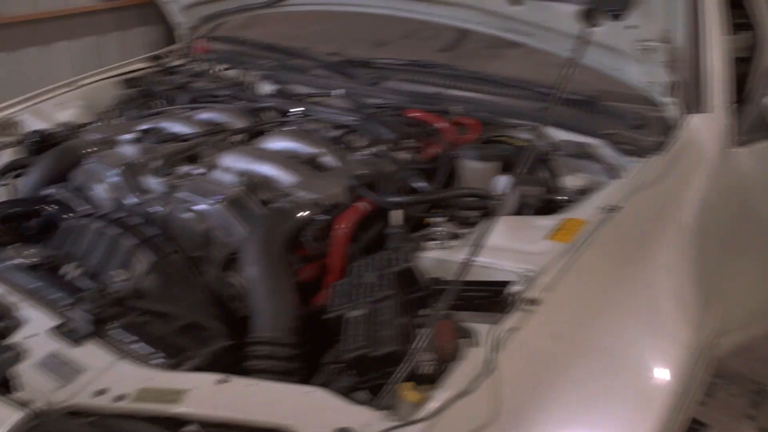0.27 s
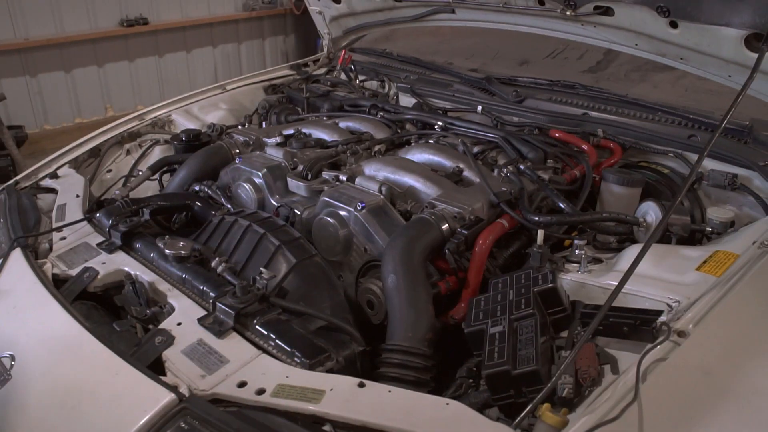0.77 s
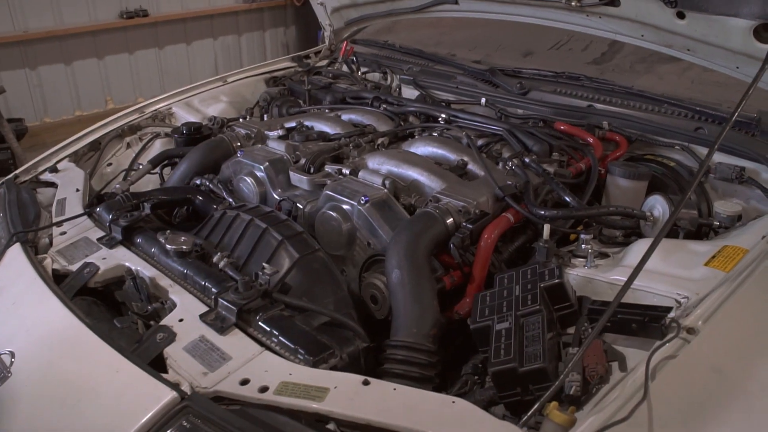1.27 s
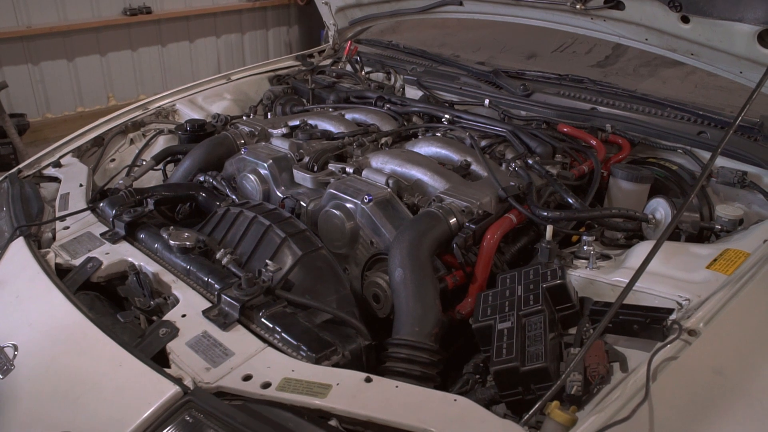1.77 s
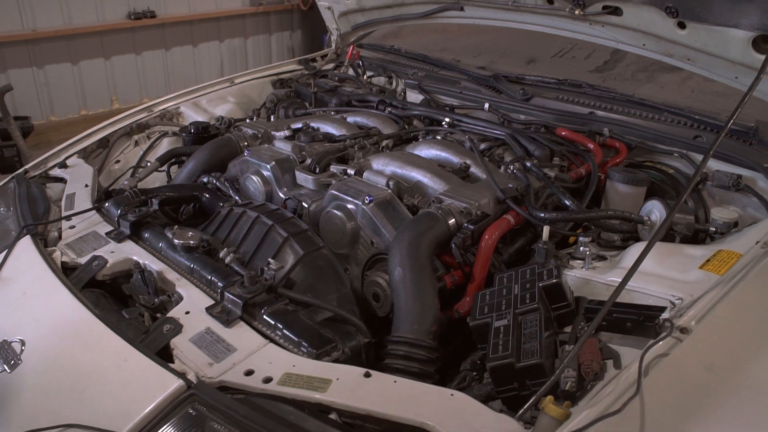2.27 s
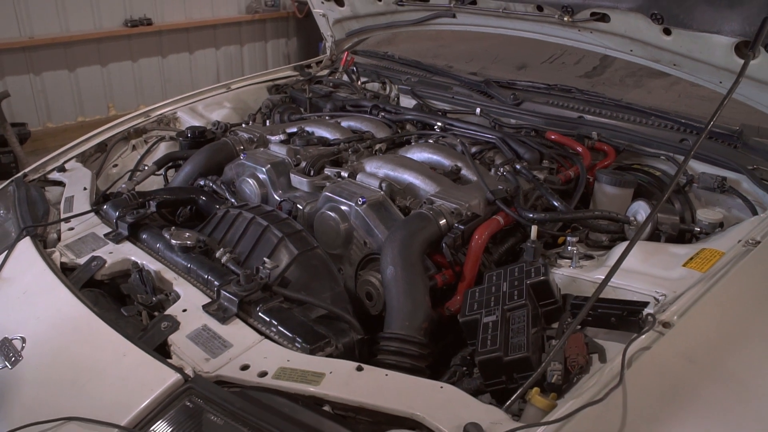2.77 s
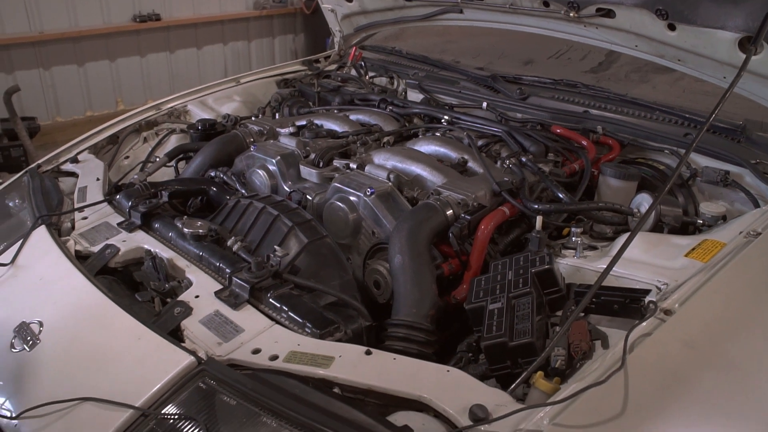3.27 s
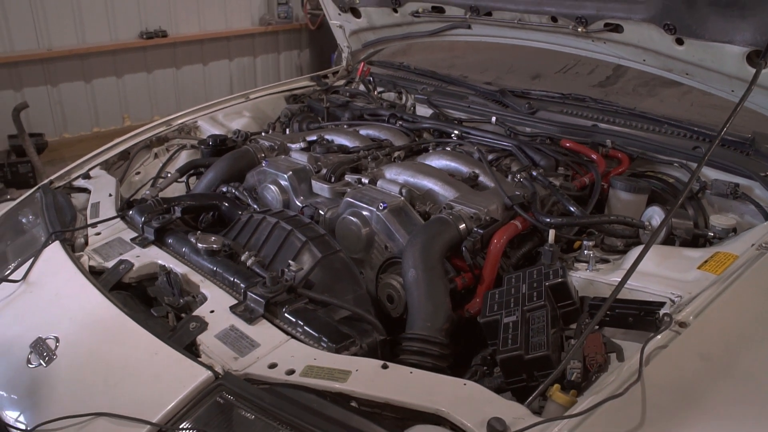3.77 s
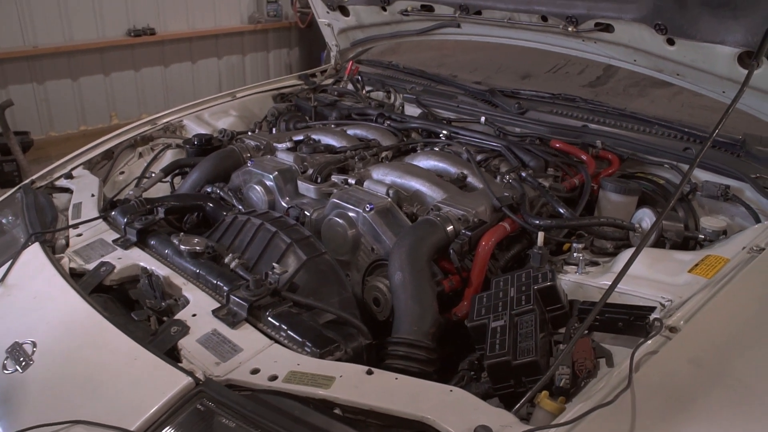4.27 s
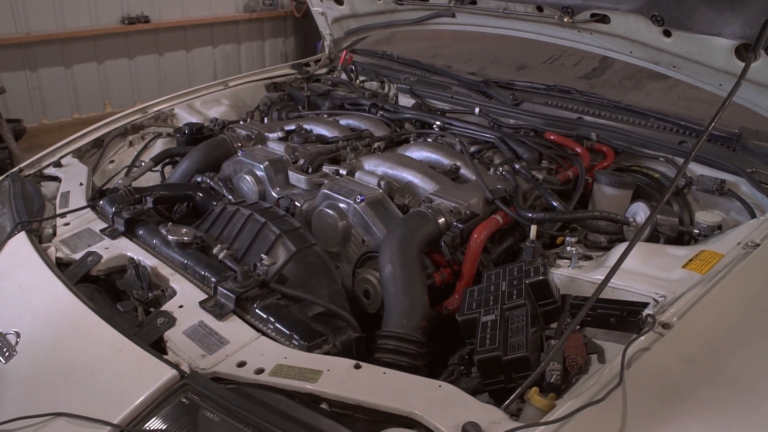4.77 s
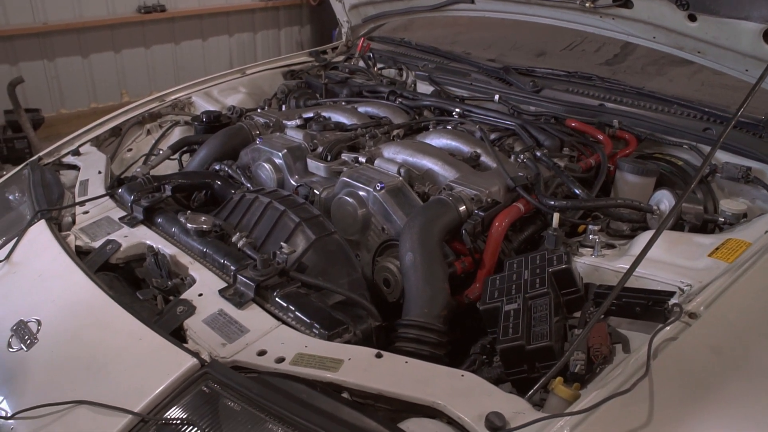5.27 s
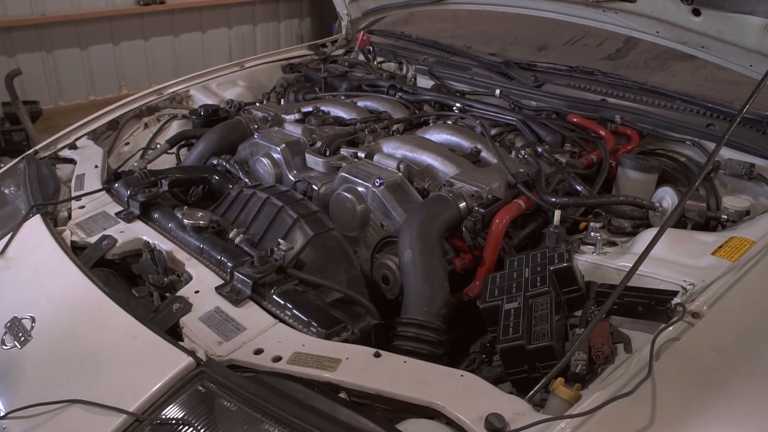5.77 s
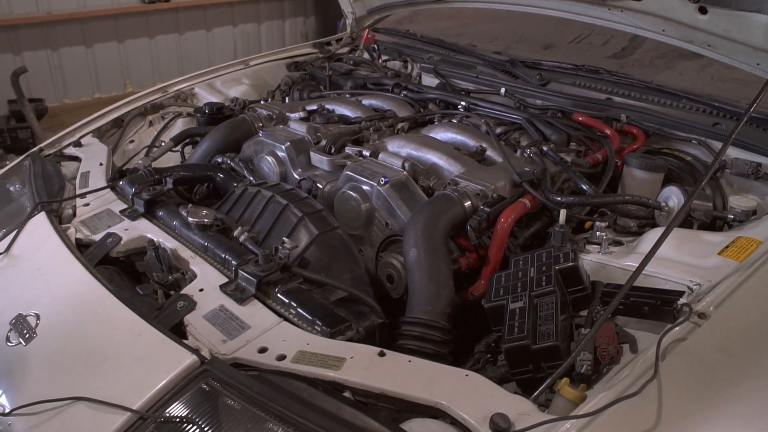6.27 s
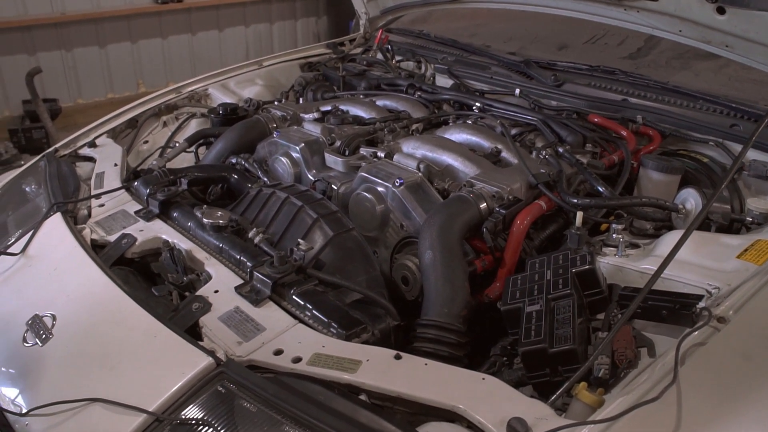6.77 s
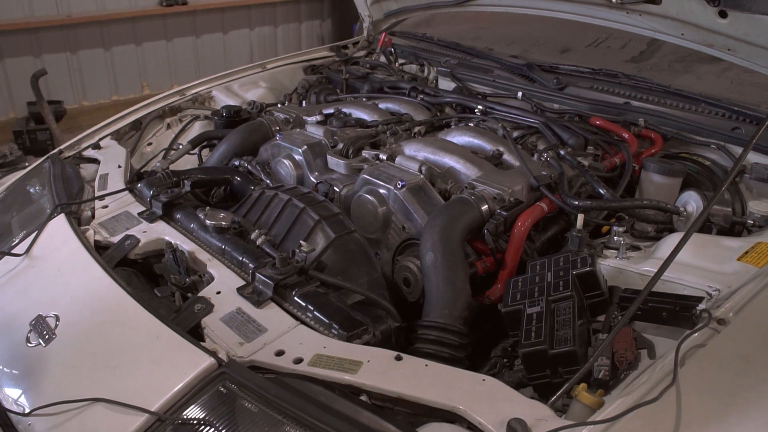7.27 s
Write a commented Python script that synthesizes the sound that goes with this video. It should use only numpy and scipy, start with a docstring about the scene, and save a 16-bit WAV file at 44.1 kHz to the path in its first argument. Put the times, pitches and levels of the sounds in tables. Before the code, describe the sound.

Close under an open bonnet in a workshop, a starter clashes in and grinds with whining gears and thumping compressions for under a second. The engine catches with uneven booms while slipping belts screech. It settles into a fast idle, mostly buried under two wavering high squeals, bright rubber hiss and small chirps. At the very end the throttle opens and the belts scream.

```python
"""Slipping drive belts on a V6 car engine, close under its open bonnet in a workshop, on one microphone.
Two wavering squeal modes, made of tones and narrow noise, ride over a bright hiss and rasp of shaped noise.
Slack stretches sag the pitch as the belts go round; skips chirp, and at the end the throttle opens and they scream.
The starter grinds first, with whining gear teeth and thumps; the engine catches, stumbles and idles fast,
built from crank harmonics and rumble. Behind the belts and starter the workshop answers with short echoes."""
import sys
import numpy as np
from scipy import signal
from scipy.fft import rfft, irfft, next_fast_len
from scipy.io import wavfile
from scipy.ndimage import uniform_filter1d, map_coordinates

SR = 44100
rng = np.random.default_rng(int(sys.argv[2]) if len(sys.argv) > 2 else 0)


def digitize_waveform(pressure):
    """Quantize a signal to 16-bit integers and store it at the path in sys.argv[1].

    Rows of a 2-D input are taken as channels; values are limited to [-1, 1].
    """
    field = np.atleast_2d(pressure).T
    bounded = np.clip(field, -1, 1)
    quanta = np.round(bounded * 32767).astype(np.int16)
    wavfile.write(sys.argv[1], SR, quanta)


N = 331632

# Levels are set before each layer's trim; spectra are relative, since each layer is brought to rms 1.
# the slipping belt goes round at a nearly even pace: (time [s], distance run [laps])
BELT_TRAVEL = [(.73, 0), (2.03, 5), (2.32, 6), (7.52, 26.25)]
# slack stretches reaching the pulley once a lap, sags before looseness and scatter:
# (place [laps], fall [laps], recovery [laps], pitch sag [octaves])
SLACK_STRETCHES = [(-.01, .11, .21, .36), (.52, .1, .1, .21)]
# how loose the belt runs: (time [s], factor on the sags [ratio])
LOOSENESS = [(.85, .2), (1, 1), (1.15, .1), (1.55, .1), (1.65, 1.1), (1.8, .8), (2.1, .6), (2.4, .8),
             (2.85, 1.4), (3.4, 1.4), (3.7, 1.05), (5, .8), (6.2, .8), (7.2, 1.2), (7.4, .1)]
# lower belt mode while the belt is taut: (time [s], pitch [Hz])
TAUT_PITCH = [(.8, 3500), (.87, 3100), (1.1, 3020), (1.24, 3260), (1.45, 2950), (1.5, 3300), (1.55, 2980),
              (1.6, 3220), (1.72, 3000), (1.97, 3200), (2.07, 2780), (2.5, 2580), (6.3, 2600), (6.55, 2400),
              (7.26, 2400), (7.43, 1240)]
# the upper mode clings to a pulley resonance: (lower mode [Hz], upper mode [Hz])
UPPER_MODE = [(1350, 3000), (1900, 3200), (2150, 3300), (2330, 3790), (2620, 3870), (2850, 4250),
              (3100, 4500), (3250, 4750)]
# lower belt mode: (time [s], level [dB])
LOWER_LEVEL = [(.8, -40), (.88, -22.5), (1.1, -20), (1.2, -31), (1.57, -46), (1.61, -18), (2.15, -19.5),
               (2.4, -25), (3.8, -25.5), (4.3, -23), (6.2, -25), (6.5, -30), (7.52, -31)]
# upper belt mode: (time [s], level [dB])
UPPER_LEVEL = [(.8, -45), (.83, -19.5), (.95, -35), (1.18, -20), (1.46, -36), (1.51, -22), (1.65, -27.5),
               (2.1, -30.5), (2.7, -27.5), (5, -27.5), (6.3, -28.5), (7.52, -32)]
# the upper mode tears into a screech while the engine catches: (time [s], noisy skirt against core [ratio])
SCREECH = [(.8, 2), (.9, 1.1), (1.1, 1), (1.18, 2.6), (1.46, 2.6), (1.5, .8), (1.58, 1.8), (1.7, .9),
           (2.2, .55), (6.3, .55), (7.3, 1.1)]
# belt rubbing on the pulleys: (time [s], level [dB])
SLIP_LEVEL = [(.72, -72), (.745, -21.5), (.8, -49), (.83, -26), (.95, -23), (1.21, -22), (1.27, -33.5),
              (1.48, -39), (1.53, -23), (1.57, -23.5), (4.2, -22.5), (7.52, -22.5)]
# bright hiss of the rubbing: (frequency [Hz], density [dB per Hz])
HISS_SPECTRUM = [(800, -35.5), (2000, -19.5), (3000, -2), (4400, -8), (5500, -9.5), (6700, 1), (8400, -2),
                 (9400, 0), (10600, -13), (12300, -11), (13800, -8), (15800, -16.5)]
# rasp of the rubbing: (frequency [Hz], density [dB per Hz])
RASP_SPECTRUM = [(300, -10), (700, -16.5), (1020, -8), (1800, 2.5), (3000, 5), (4200, -11.5), (5400, 5),
                 (7000, 0.5), (10000, -21), (15000, -28)]
# pulleys and brackets rung by a slack belt: (frequency [Hz], width [Hz], level against the hiss [dB])
PULLEYS = [(1290, 400, -14), (1830, 300, -13), (4760, 240, -15), (5380, 340, -10)]
# short falling chirps of a skipping belt: (time [s], level [dB])
CHIRPS = [(2.235, -33), (2.31, -42), (2.44, -32), (2.77, -32), (3.051, -26.5), (3.329, -36), (3.49, -26),
          (3.57, -34), (4.51, -31), (5.02, -36), (6.71, -25.5), (6.809, -27), (6.92, -27), (6.97, -38),
          (7.07, -36), (7.19, -25.5)]
# the throttle opens: (time [s], groan level [dB], scream level [dB])
REV_LEVEL = [(7.26, -55, -48), (7.35, -43, -32), (7.38, -27, -18), (7.45, -38, -18), (7.52, -24, -15.5)]
# broad scream of the belts: (frequency [Hz], density [dB per Hz])
SCREAM_SPECTRUM = [(700, -18), (1200, -5.5), (2200, -7), (3600, -7), (4700, -7), (6700, 2), (8500, -4),
                   (10500, -9), (15000, -15)]
# the starter engages with a clash, turns and drops out: (time [s], grinding level [dB])
STARTER_LEVEL = [(0.0, -27), (0.012, -11.5), (0.054, -19.5), (0.11, -16), (0.79, -19.5), (0.884, -32),
                 (0.9, -38)]
# starter housing coloring the grind: (frequency [Hz], density [dB per Hz])
HOUSING = [(88, -67.5), (150, -37), (343, -29), (378, -13), (486, -8.5), (545, -22.5), (624, -12.5),
           (1030, -5.5), (1490, -12.5), (1700, -12), (2500, -15), (3540, -18), (3820, -21.5), (4290, -19),
           (15000, -40.5)]
# ring gear and bell housing resonances: (frequency [Hz], width [Hz], gain [dB])
GEAR = [(495, 50, 6), (850, 70, 11), (1030, 80, 12), (1250, 80, 13), (1730, 110, 13), (2510, 130, 10)]
# solenoid kick, then compression strokes: (time [s], thump level [dB])
STROKES = [(0.012, -26), (0.201, -23), (0.317, -19), (0.422, -23), (0.506, -24), (0.593, -19), (0.678, -19),
           (0.76, -75), (0.804, -20)]
# low rumble of the engine being turned over: (frequency [Hz], density [dB per Hz])
TURNING_SPECTRUM = [(30, -10), (70, -3), (200, -2), (400, -10), (900, -40)]
# crankshaft: (time [s], speed [turns per second])
CRANK_SPEED = [(0, 3), (.7, 4.5), (.8, 18), (1, 22), (1.15, 19), (1.55, 21), (1.8, 17.5), (2.25, 23.9),
               (2.63, 25.1), (2.95, 27.1), (3.78, 26.6), (4.65, 23.8), (5.4, 24.5), (6.2, 24.1),
               (6.75, 31.3), (7.2, 29.6), (7.35, 38), (7.52, 43)]
# engine layers: (time [s], exhaust boom [dB], exhaust drone [dB], intake and block [dB])
ENGINE_LEVEL = [(0.76, -22, -43, -37), (0.81, -28, -24.5, -31), (0.89, -30, -30.5, -42),
                (1.14, -36, -37, -40), (1.27, -21.5, -28, -29), (1.4, -24.5, -25, -28),
                (1.44, -12.5, -29, -31), (1.47, -33, -28, -26.5), (1.51, -19, -24, -31),
                (1.55, -27, -29.5, -41), (1.87, -41, -41, -46.5), (2.0, -27, -32.5, -44),
                (2.23, -43, -37, -49.5), (2.4, -36, -36, -45.5), (3.32, -45.5, -39, -46.5),
                (5.77, -46, -42.5, -43.5), (6.16, -47, -37, -43), (6.41, -52, -43, -45.5),
                (7.16, -57, -48, -47), (7.35, -20.5, -24.5, -33.5), (7.44, -42, -19, -32),
                (7.52, -39, -26, -33)]
# uneven firing: (time [s], roughness [0-1])
STUMBLE = [(.8, .55), (1.5, .6), (1.8, .4), (2.3, .1), (6.2, .1), (6.5, .25), (7.5, .25)]
# harmonics of the exhaust boom: (multiple of crank speed [ratio], level [dB])
BOOM_ORDERS = [(1, -9), (2, 0), (3, -8)]
# harmonics of the exhaust drone: (multiple of crank speed [ratio], level [dB])
DRONE_ORDERS = [(3, -4), (4, 3.5), (5, -1), (6, 1), (7, 3), (8, -3), (9, -11), (10, 0.5), (11, -5),
                (12, -5)]
# exhaust pipe response: (frequency [Hz], gain [dB])
PIPE = [(20, -22), (38, -21), (47, 0), (58, 2.5), (72, -5), (84, -1.5), (108, -8.5), (121, 0.5), (134, 5.5),
        (146, 6.5), (162, -3), (192, -5), (216, 1), (245, -3), (290, -35), (324, 0.5), (380, -33),
        (600, -35)]
# intake and block noise: (frequency [Hz], density [dB per Hz])
BLOCK_SPECTRUM = [(120, -25), (200, 5), (282, -7), (467, 1), (570, -5.5), (912, -6.5), (2650, -3),
                  (4550, -9), (5550, -11), (5970, -3.5), (6650, -12), (13000, -34), (15000, -41)]
# resonances of the engine bay: (frequency [Hz], width [Hz], gain [dB])
BAY = [(522, 40, 5.5), (567, 55, -3.5), (789, 38, 8), (1011.4, 66, 12), (1274, 50, 3), (1800, 76, 0.5),
       (2030, 87, -5), (3665, 240, 4.5), (4480, 1380, 5.5), (5560, 136, 3), (6540, 280, 2.5),
       (7996, 320, 7), (8514, 260, 8.5)]
# echo of the workshop: (frequency [Hz], time to die by 60 dB [s])
WORKSHOP_DECAY = [(200, 0.21), (2000, 0.08), (12000, 0.019)]

SAG_SCATTER = .12  # random share by which the sags vary
STEADY_SHARE = .5  # power share of a squeal's core that is an unbroken tone
UPPER_SLACK_DB_PER_OCTAVE = 2.5  # the upper mode's level rises with the sag
SHRIEK_DB, OVERTONE_DB = -8, -12  # second and third harmonic of the upper mode, before tautness and trim
CHATTER_DB = 0.76  # quick flutter of all the rubbing
SURGE_DB = .9  # irregular surging of the hiss
SIZZLE_SLACK_DB_PER_OCTAVE = -17  # the finest sizzle fades as the pitch falls
RASP_BELOW_HZ = 2460  # under this pitch the belt rasps more than it sings
TOOTH_START_HZ, TOOTH_FULL_HZ, SPIN_UP_S = 130, 561.6, .24  # unloaded tooth rate climbs and levels off
TOOTH_JITTER = .009  # unsteadiness as a share of the tooth rate
REBOUND = .09  # share by which the pinion speeds up as a compression lets go
LOAD_LAG_S, LOAD_WIDTH_S, LOAD_DB = 0.0162, .02, 5  # each compression makes the gears grind harder
# whine against the grinding: clear at first, it drowns with time
WHINE_DB, WHINE_FADE_DB_PER_S, WHINE_LOAD_DB = -1, 7, 1.5
WHINE_FLICKER_DB = 5  # each harmonic of the whine comes and goes on its own
TURNING_DB = -47
BOOM_DB, DRONE_DB, BLOCK_DB = 0.5, 1.5, 7.5  # trim of each engine layer
SWELL_S, SWELL_WIDTH_S, SWELL_DB = 4.9, 0.26, 4.5  # the drone swells once at idle
TOP_HZ = 15800  # upper limit of the microphone's band


def amp(db):
    """Decibels to gain."""
    return 10 ** (np.asarray(db) / 20)


def unit(x):
    """Scaled to rms 1."""
    return x / np.sqrt(np.mean(x ** 2) + 1e-20)


def along(points, hz):
    """(Hz, value) points read on a log frequency axis."""
    f, v = np.transpose(points)
    return np.interp(np.log(hz + 1), np.log(f + 1), v)


def curves(rows):
    """One value per sample for each column after the time."""
    s, *cols = np.transpose(rows)
    return [np.interp(np.arange(N) / SR, s, c) for c in cols]


def during(rows):
    """1 while a table lasts, fading over 30 ms outside it."""
    t = np.arange(N) / SR
    inside_s = np.minimum(t - rows[0][0], rows[-1][0] - t)
    return np.clip(1 + inside_s / .03, 0, 1)


def bump(x, width):
    """A bell of height 1 around x = 0."""
    return np.exp(-(x / width) ** 2)


def wobble(rate):
    """A smooth random curve, rate knots a second."""
    knots = rng.standard_normal(N // 8 + 2)
    places = np.arange(N) / 8
    smooth = map_coordinates(knots, [places])
    return np.interp(np.arange(N) * rate / SR, places, smooth)


def filtered(x, response):
    """x times a response of frequency."""
    m = next_fast_len(N + SR // 2)
    return irfft(rfft(x, m) * response(np.fft.rfftfreq(m, 1 / SR)), m)[:N]


def peaks(table, hz):
    """Gain of (Hz, width, dB) resonances."""
    return amp(sum(db / (1 + (2 * (hz - centre) / width) ** 2) for centre, width, db in table))


def coloured(x, spectrum):
    """x through a (Hz, dB) spectrum, at rms 1."""
    return unit(filtered(x, lambda hz: amp(along(spectrum, hz))))


def grit(spectrum, spread_db):
    """Dense tiny contacts of scattered sizes, through a spectrum."""
    contacts = rng.standard_normal(N) * amp(spread_db * wobble(2500))
    return coloured(contacts, spectrum)


def angle(hz):
    """Running phase of a changing frequency."""
    return 2 * np.pi * np.cumsum(hz) / SR


def ringing(hz, width_hz):
    """A moving resonance kept ringing by friction, rms 1."""
    phase = angle(hz)
    return unit(wobble(width_hz) * np.cos(phase) + wobble(width_hz) * np.sin(phase))


def belt_pitch():
    """Lower mode's pitch [Hz] and sag [octaves]: each slack stretch drops it, then tension returns."""
    laps, = curves(BELT_TRAVEL)
    slack = 0
    for place, fall, recovery, octaves in SLACK_STRETCHES:
        past = (laps - place + .5) % 1 - .5
        slack = slack + octaves * bump(past, np.where(past < 0, fall, recovery))
    sag = curves(LOOSENESS)[0] * slack * (1 + SAG_SCATTER * wobble(8))
    return curves(TAUT_PITCH)[0] * 2 ** -sag, sag


def squeal_mode(hz, skirt):
    """Friction feeds a mode in fits and starts: a sharp core in a fuzzy skirt."""
    tone = np.sqrt(2 * STEADY_SHARE) * np.sin(angle(hz))
    core = tone + np.sqrt(1 - STEADY_SHARE) * ringing(hz, width_hz=120)
    voice = (core + skirt * ringing(hz, width_hz=650)) / np.sqrt(1 + skirt ** 2)
    return unit(voice * amp(1.7 * wobble(45)))


def squeal(crank, pitch, sag):
    """Stick-slip friction drives two competing belt modes, with overtones that grow on a taut belt."""
    lower_db, = curves(LOWER_LEVEL)
    upper_db = curves(UPPER_LEVEL)[0] + UPPER_SLACK_DB_PER_OCTAVE * sag
    slip_db, = curves(SLIP_LEVEL)
    screech, = curves(SCREECH)
    taut = np.clip((pitch - 2300) / 800, 0, 1)
    flutter = 1 + .012 * wobble(35) + 0.0047 * np.sin(3 * crank)
    upper_hz = np.interp(pitch, *np.transpose(UPPER_MODE)) * flutter
    # one mode swells as the other fades
    rivalry_db = 0.53 * wobble(16)
    lower_gain = amp(lower_db - 8.5 + 0.38 * taut + rivalry_db)
    lower = lower_gain * squeal_mode(pitch * flutter, screech / 2)
    upper = amp(upper_db - 6.0 - rivalry_db) * squeal_mode(upper_hz, screech)
    # broad shriek around twice the upper mode, stronger when taut
    shriek = amp(slip_db - 14.5 + 10 * taut) * ringing(2 * upper_hz, width_hz=1300)
    second = amp(SHRIEK_DB) * ringing(2 * upper_hz, width_hz=400)
    third = amp(OVERTONE_DB) * ringing(3 * upper_hz, width_hz=900)
    overtones = amp(upper_db - 7) * taut * (second + third)
    return during(LOWER_LEVEL) * (lower + upper + shriek + overtones)


def rubbing(crank, pitch):
    """Rubber skids on the pulleys: bright hiss, rasp and sizzle; slack stretches ring the pulleys harder."""
    slip_db, = curves(SLIP_LEVEL)
    # octaves under the pitch where rasping takes over
    slack = np.log2(RASP_BELOW_HZ / pitch)
    chatter = amp(CHATTER_DB * (wobble(45) + wobble(250) + np.sin(4 * crank)))
    hiss = grit(HISS_SPECTRUM, spread_db=1) * amp(SURGE_DB * wobble(22))
    # a taut belt hardly rasps
    bite_db = 18 * np.clip(slack, -.4, 0) + 4 * np.clip(slack, 0, .5) + 0.96 * wobble(30)
    rasp = grit(RASP_SPECTRUM, spread_db=5.0) * amp(bite_db - 3.5)
    rings = sum(amp(db) * ringing(np.full(N, hz), width) for hz, width, db in PULLEYS)
    pulleys = np.clip(3 * slack, .15, 1.2) * rings
    sizzle_db = -13.5 + SIZZLE_SLACK_DB_PER_OCTAVE * slack + 3.76 * wobble(25)
    sizzle = grit([(7000, -36), (10500, 2), (13800, 2), (15800, -11)], spread_db=5) * amp(sizzle_db)
    return during(SLIP_LEVEL) * amp(slip_db) * chatter * (hiss + rasp + pulleys + sizzle)


def chirps():
    """Each skip of the belt gives a brief squeak that falls in pitch."""
    t = np.arange(N) / SR
    nearest = np.abs(t[:, None] - np.transpose(CHIRPS)[0]).argmin(axis=1)
    s, db = np.array(CHIRPS)[nearest].T
    # falls at 4000 Hz per second through 1830 Hz
    hz = 1830 - 4000 * np.clip(t - s, -.05, .05)
    squeak = np.sin(angle(hz)) + 0.29 * ringing(hz, width_hz=660)
    return amp(db + 4.5) * bump(t - s, 0.016) * squeak


def rev(crank, pitch):
    """The crank pulley runs away from the belt: a low groan under a broad scream."""
    groan_db, scream_db = curves(REV_LEVEL)
    groan = amp(groan_db) * ringing(pitch, width_hz=200)
    scream = amp(scream_db + 1.1 * np.sin(3 * crank)) * grit(SCREAM_SPECTRUM, spread_db=0)
    onset = np.clip((np.arange(N) / SR - REV_LEVEL[0][0]) * 20, 0, 1)
    return onset * (groan + scream)


def gear_whine(tooth_hz):
    """Harmonics of the meshing teeth excite the gear resonances; rms 1 while the starter turns."""
    mesh = angle(tooth_hz * (1 + TOOTH_JITTER * wobble(120)))
    teeth = 0
    for k in range(2, 9):
        flicker = amp(WHINE_FLICKER_DB * wobble(25))
        teeth = teeth + flicker * np.sin(k * mesh + rng.uniform(0, 2 * np.pi)) / np.sqrt(k)
    active = during(STARTER_LEVEL)
    return unit(filtered(teeth * active, lambda hz: peaks(GEAR, hz))) * np.sqrt(np.mean(active))


def starter():
    """The pinion whines and grinds on the ring gear; each compression loads it and thumps the block."""
    t = np.arange(N) / SR
    grind_db, = curves(STARTER_LEVEL)
    load = sum(bump(t - s - LOAD_LAG_S, LOAD_WIDTH_S) for s, db in STROKES).clip(0, 1)
    spin_up = (TOOTH_START_HZ - TOOTH_FULL_HZ) * np.exp(-t / SPIN_UP_S)
    tooth_hz = (TOOTH_FULL_HZ + spin_up) * (1 + REBOUND * load)
    whine_db = WHINE_DB - WHINE_FADE_DB_PER_S * t + WHINE_LOAD_DB * load
    thumps = sum(amp(db) * bump(t - s - .003, 0.0065) * np.cos(2 * np.pi * 58 * (t - s))
                 for s, db in STROKES)
    whine = amp(whine_db) * gear_whine(tooth_hz)
    gear_ring = amp(-4.5) * bump(t - .16, 0.16) * ringing(np.full(N, 1725.), width_hz=36.0)
    # the grind gives way where the whine is strong
    grind = grit(HOUSING, spread_db=0.5) * amp(2.5 * wobble(109.3)) / np.sqrt(1 + 2 * amp(2 * whine_db))
    clash = grit([(1000, 1.5), (2500, -13), (8000, 1.0), (15000, -29)], spread_db=6) * load
    motor = amp(3.0 + LOAD_DB * load) * grind + whine + gear_ring + amp(-8.5) * clash
    turning = amp(TURNING_DB) * grit(TURNING_SPECTRUM, spread_db=-2)
    return during(STARTER_LEVEL) * (amp(grind_db - 4.0) * motor + turning) + thumps


def engine(crank):
    """Exhaust boom and drone, with intake and block noise pulsing once and three times a turn."""
    boom_db, drone_db, block_db = curves(ENGINE_LEVEL)
    drone_db = drone_db + SWELL_DB * bump(np.arange(N) / SR - SWELL_S, SWELL_WIDTH_S)
    rough = np.clip(curves(STUMBLE)[0], 0, 1)
    boom_rumble = [(15, -26), (35, -37), (60, 8), (90, 15), (160, -41)]
    drone_rumble = [(60, -47), (115, 11.0), (220, -10), (290, -18), (600, -51)]
    boom = amp(boom_db + BOOM_DB) * exhaust(crank, BOOM_ORDERS, rough, boom_rumble)
    drone = amp(drone_db + DRONE_DB) * exhaust(crank, DRONE_ORDERS, rough, drone_rumble)
    pulse = unit(1 + 0.16 * np.cos(3 * crank) + 0.13 * np.cos(crank))
    block = amp(block_db + BLOCK_DB) * grit(BLOCK_SPECTRUM, spread_db=0) * pulse
    return during(ENGINE_LEVEL) * (boom + drone + block)


def exhaust(crank, orders, rough, rumble):
    """Harmonics of the crank speed pass through the pipe; uneven burns smear them into rumble."""
    speed, = curves(CRANK_SPEED)
    # an open throttle favours the low orders (dB lost per order)
    tilt_db = .25 * np.maximum(speed - 31, 0)
    lurch = rough * wobble(14)
    lines = 0
    for k, db in orders:
        level = amp(db - k * tilt_db + 1.2 * wobble(4))
        lines = lines + level * np.sin(k * (crank + lurch / 3) + rng.normal(0, 1))
    lines = coloured(lines, PIPE)
    # level evened over a quarter second
    lines /= np.sqrt(np.abs(uniform_filter1d(lines ** 2, size=SR // 4)) + 1e-6)
    return np.sqrt(1 - rough ** 2) * lines + rough * grit(rumble, spread_db=2.5)


def workshop(x):
    """Bonnet and walls answer, drifting smoothly from moment to moment; the treble dies first."""
    wet, step = np.zeros(N + 2 * SR), SR // 10
    padded = np.pad(x, (step, 2 * step))
    fade = np.sin(np.pi * np.arange(2 * step) / (2 * step))
    for start in range(0, N + step, step):
        hz, t, z = signal.stft(rng.standard_normal(SR // 3), SR, nperseg=256)
        decay = amp(-60 * t / along(WORKSHOP_DECAY, hz)[:, None])
        tail = signal.istft(z * decay, SR, nperseg=256)[1]
        # unit energy, so the echo's level is set in scene()
        echo = signal.fftconvolve(fade * padded[start:start + 2 * step], tail / np.linalg.norm(tail))
        wet[start:start + len(echo)] += echo
    return wet[step:step + N]


def scene():
    """Belts, starter and engine sound from the engine bay into the workshop."""
    crank = angle(curves(CRANK_SPEED)[0])
    pitch, sag = belt_pitch()
    belts = squeal(crank, pitch, sag) + rubbing(crank, pitch) + chirps() + rev(crank, pitch)
    gears = starter()
    running = belts + amp(-5.0) * workshop(belts) + engine(crank)
    starting = gears + amp(-14) * workshop(gears)
    in_bay = filtered(running, lambda hz: peaks(BAY, hz))
    return (amp(-1.47) * in_bay + starting)[None]


def record(dry):
    """The microphone chain rounds off the highest peaks and keeps nothing above its band limit."""
    soft = dry[0] / (1 + np.abs(dry[0] / .62) ** 6) ** (1 / 6)
    return filtered(soft, lambda hz: hz < TOP_HZ)[None]


dry = scene()
out = record(dry)
digitize_waveform(out)
```